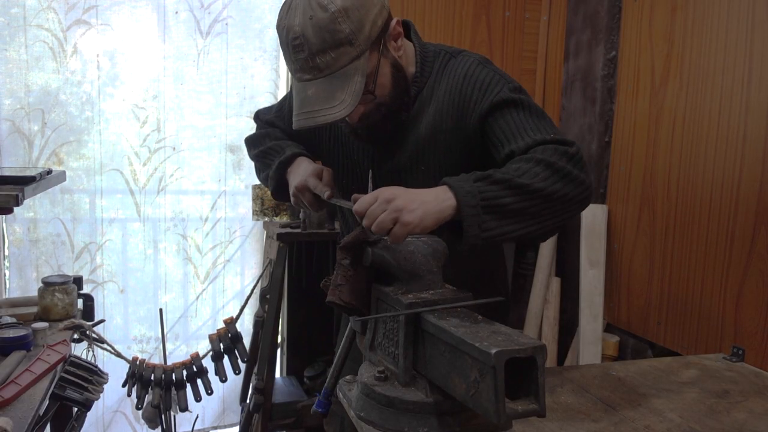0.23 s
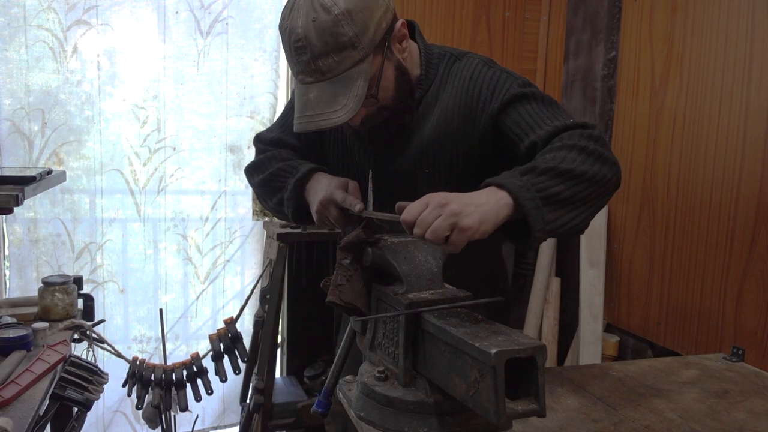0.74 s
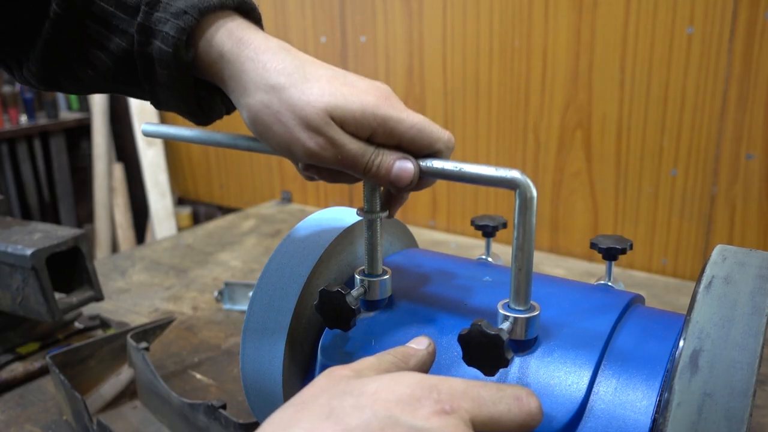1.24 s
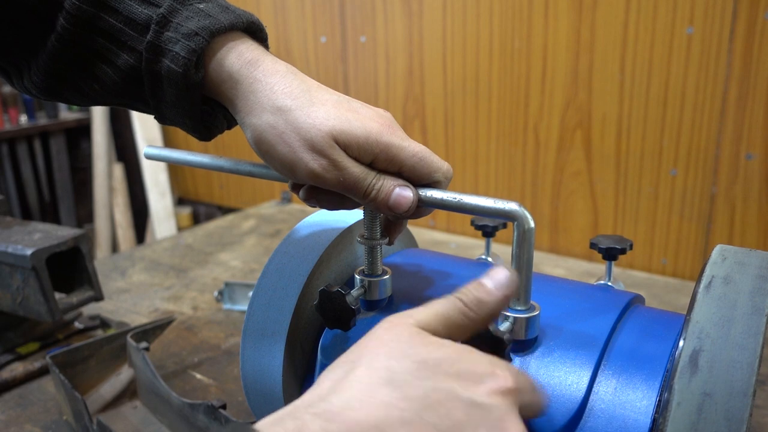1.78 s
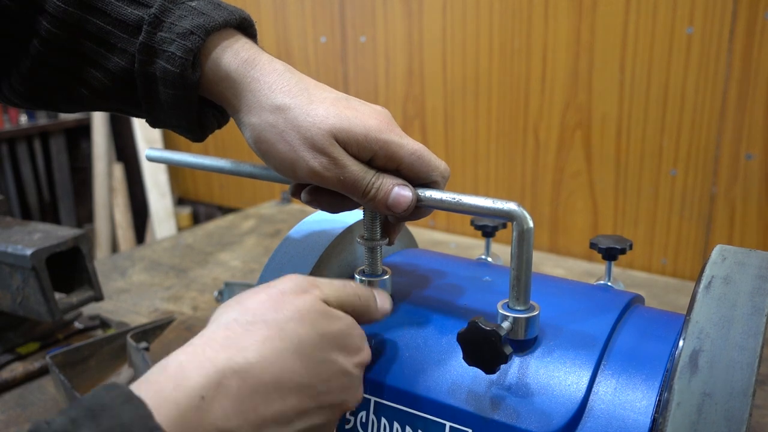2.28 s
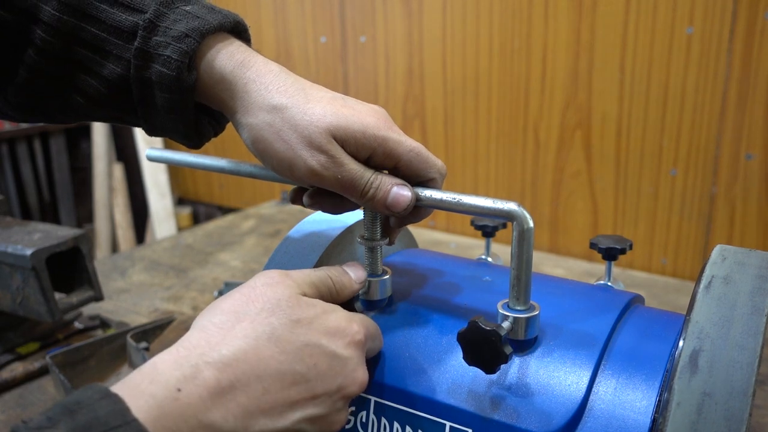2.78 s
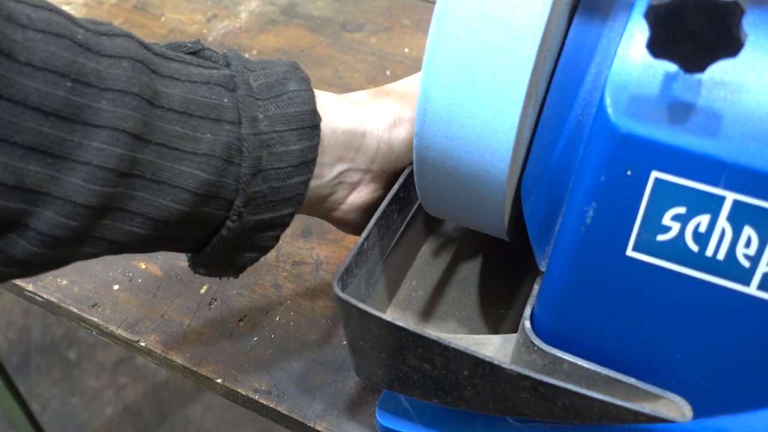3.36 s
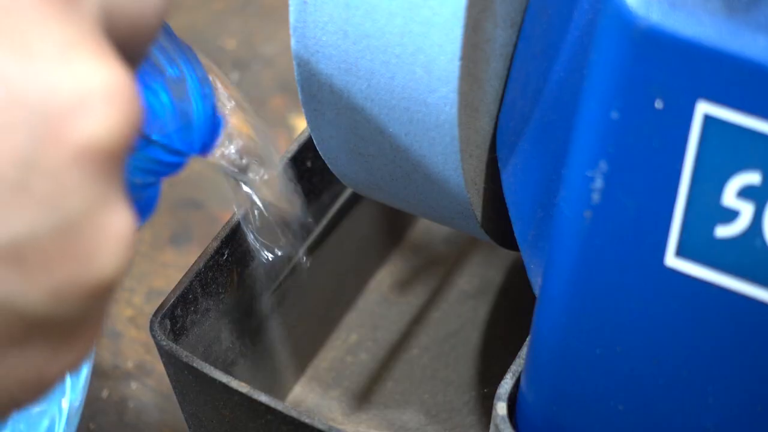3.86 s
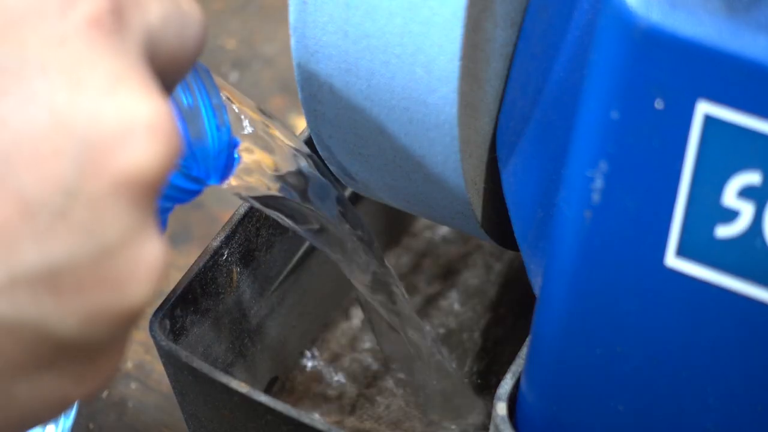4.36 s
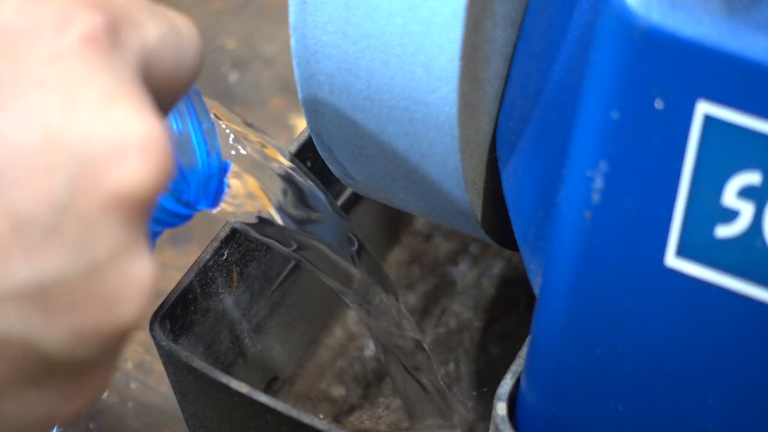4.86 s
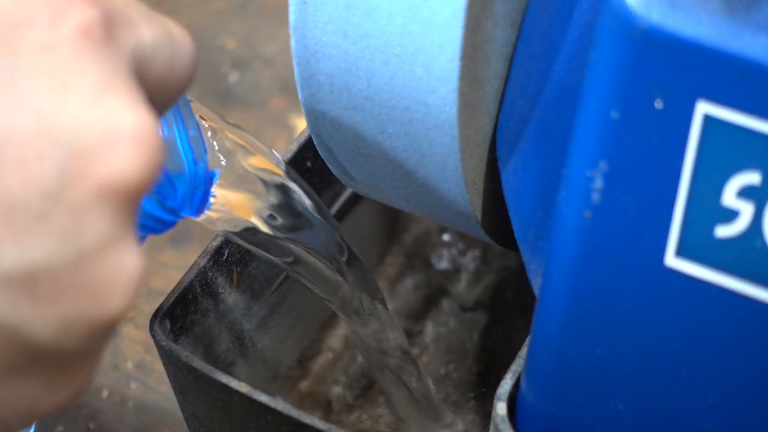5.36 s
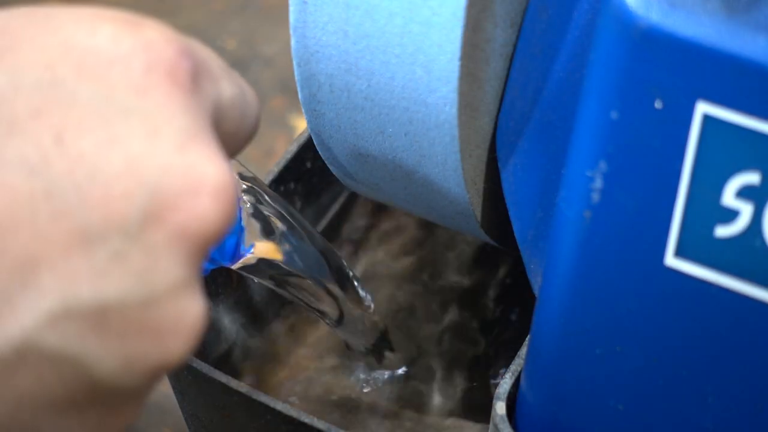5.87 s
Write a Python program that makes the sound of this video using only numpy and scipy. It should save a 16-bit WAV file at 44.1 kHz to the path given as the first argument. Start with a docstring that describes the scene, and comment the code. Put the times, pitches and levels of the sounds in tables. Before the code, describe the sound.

A bare, echoing workshop with faint, dull air, heard close up. At 0 s the tail of a file stroke fades; at 0.38 the file taps down on a steel chisel and a second gritty rasp swells to about 0.65, ringing metallically over a low bench rumble, cutting off at 0.87. A steel bar knocks at once, then judders and groans in its sleeves, strongest at 1.05-1.25, with lesser slips to 1.65, a sharp click at 1.8 and small creaks around 2.2-2.4. A soft, low bump comes at 2.66. From 2.9 a plastic trough scrapes with a short rising squeak, clatters home by 3.15, and shudders hollowly until 3.7. From 3.83 water drums softly, bubbling from 3.97, with bright splashes and spray, busiest at 4.8-5.0 with a deep gulp. A final slosh swells at 5.6, then at 5.67 the splashing drops abruptly to a quiet wash.

```python
"""Three jobs in a bare, echoing workshop, one straight after another, over faint still air.
First a hand file rasps over a chisel in a vise: clumped tooth catches excite the steel's resonances.
Next a steel support bar judders down into the sleeves of a wet grinder by stick-slip, knocks and groans.
Then, after a soft bump on the bench, the grinder's plastic trough is dragged, shoved home and shudders.
Last, water is poured into it from a bottle, bubbling, spattering and drumming, then cuts to a quiet wash."""
import sys
import numpy as np
from scipy import signal
from scipy.fft import rfft, irfft, next_fast_len
from scipy.io import wavfile
from scipy.ndimage import uniform_filter1d

SR = 44100
rng = np.random.default_rng(int(sys.argv[2]) if len(sys.argv) > 2 else 0)


def wav_out(sig):
    """Save sig, one row per channel (or a flat mono array), as 16-bit PCM at SR to the path in sys.argv[1]."""
    wavfile.write(sys.argv[1], SR, np.round(np.clip(np.atleast_2d(sig).T, -1, 1) * 32767).astype(np.int16))


N = 270333
TIME = np.arange(N) / SR   # s
CUTOFF_HZ = 11150

# Colour of the still air: (frequency [Hz], relative density [dB per Hz])
AIR_COLOUR = [(20, -4), (100, -2.5), (220, -5), (550, -13), (900, -22), (2000, -22.5), (4000, -27.5),
              (11000, -34.5)]
AIR_DB = -67.3
# Decay time of the workshop's echo: (frequency [Hz], t60 [s])
ROOM_T60 = [(120, 0.75), (400, 0.43), (1400, 0.626), (4000, 0.1858), (10000, .5)]
# Stereo width of surrounding sound: (frequency [Hz], side minus mid [dB])
WIDTH = [(120, -22.5), (280, -19.5), (550, -8.5), (2400, -2), (5000, 3.5), (10000, 1.5)]

# File strokes: (teeth bite [s], hardest push [s], rasp level [dB])
FILE_STROKES = [(0, .015, -42.3), (.384, .655, -36.3)]
# The push builds slowly and eases off faster
PUSH_RISE_DB_PER_S, PUSH_FADE_DB_PER_S = 26, 79
# Tooth hiss against the rasp at the hardest push; extra dB of hiss for each dB of push
HISS_DB, HISS_GROWTH = -2.3, .3
# File landing on the steel: (time [s], peak level [dB], brightness [dB per octave])
FILE_LANDS = [(0.381, -29, 1.5), (0.387, -32, -2.5)]
# Colour of the landing: (frequency [Hz], relative density [dB per Hz])
LANDING_COLOUR = [(300, -7), (950, 3), (1320, -7), (2000, 0), (3200, -7), (4800, 4), (6500, -12),
                  (8000, -19), (11000, -47.5)]
# Colour of the tooth catches: (frequency [Hz], relative density [dB per Hz])
RASP_COLOUR = [(300, -3), (560, -6), (850, 1), (1340, 2), (1480, -7), (1750, 1), (3300, 1), (6000, -10),
               (8500, -18.5), (11000, -18)]
# Resonances of the chisel: (frequency [Hz], width [Hz], gain [dB])
CHISEL_MODES = [(390, 25, -3), (915, 45, -3), (1115, 70, -8), (1275, 27, 0), (1320, 24, 5), (1900, 40, -3),
                (2060, 22, -6), (2460, 28, -5), (2780, 70, -7), (3085, 23, 2.5), (3150, 40, -8),
                (4280, 300, -10), (5200, 200, -12), (7300, 150, -8)]
# The file damps the chisel as it lands: share of the ring left, and time the ring takes to build
RING_DAMPED, RING_BUILD_S = .3, .14
# Colour of the bench's rumble: (frequency [Hz], relative density [dB per Hz])
BENCH_COLOUR = [(10, -18), (26, 2), (60, -7), (130, -14), (240, -10.5), (420, -30), (1000, -80)]
# The bench rumbles late and follows only a share of the push's swing in dB
BENCH_DB, BENCH_LAG_S, BENCH_FOLLOWS = -50, .08, .42
FILING_ENDS = 0.866   # s

# Slips of the bar in its sleeves: (time [s], judder level [dB], scrape level [dB])
BAR_SLIPS = [(0.905, -55, -51), (1.06, -41, -43), (1.094, -27, -40), (1.14, -43, -44), (1.186, -28, -39.5),
             (1.201, -28, -41), (1.25, -42, -44), (1.345, -40, -50), (1.39, -45, -55), (1.45, -39.5, -52.5),
             (1.505, -42.5, -57), (1.54, -47, -62), (1.645, -47, -49), (1.88, -56, -51), (2.23, -44, -53),
             (2.28, -50, -58), (2.355, -62, -58), (2.42, -57, -66), (2.49, -66, -63)]
# Every slip builds quickly; the judder dies sooner than the scrape
SLIP_RISE_DB_PER_S, JUDDER_FADE_DB_PER_S, SCRAPE_FADE_DB_PER_S = 560, 300, 95
# Knocks of the bar: (time [s], peak level [dB], brightness [dB per octave])
BAR_KNOCKS = [(0.866, -34, .8), (1.048, -40, -2.5), (1.076, -35, -5), (1.107, -33, -1.5),
              (1.186, -26.5, -2), (1.197, -29, -4.5), (1.6, -42.5, -4), (1.642, -45, -4.5),
              (1.811, -31.5, 2.3), (2.106, -54, 7), (2.207, -46, -6)]
# Resonances of the bar: (frequency [Hz], width [Hz], gain [dB])
BAR_MODES = [(338, 17, -2), (438, 22, -3), (473, 20, 0), (800, 79, 0), (1200, 140, -9), (2230, 470, -19),
             (3670, 740, -16)]
# Colour of the bar's contacts: (frequency [Hz], relative density [dB per Hz])
BAR_RUB_COLOUR = [(220, -7), (330, 9), (700, -3), (1400, -2.5), (3300, -13.5), (4600, -21), (11000, -33.5)]
# Judder pitch wandering as the bar tilts: (time [s], main resonance [Hz])
BAR_PITCH = [(1.19, 334), (1.28, 352), (1.465, 338), (1.5, 405), (1.53, 328), (1.65, 365), (2.21, 360),
             (2.29, 285)]

# Bump of a hand on the bench: (time [s], level [dB])
BENCH_BUMPS = [(2.66, -62)]
BUMP_DB_PER_S = 70   # builds and dies alike

# Drag of the trough's rim over the housing:
# (start [s], peak [s], level [dB], rise [dB per s], fade [dB per s])
RIM_DRAG = (2.905, 2.99, -41.5, 195, 150)
# Colour of the rim's scrape: (frequency [Hz], relative density [dB per Hz])
RIM_COLOUR = [(220, -9), (320, 2), (520, -9), (1100, -2), (2000, 2), (3000, -4), (4400, -8), (5000, -21),
              (11000, -31)]
# Squeak of the rim, rising with the drag: (time [s], pitch [Hz])
SQUEAK_PITCH = [(2.93, 1750), (2.985, 2250), (3.01, 2370)]
SQUEAK_DB, SQUEAK_JITTER = -1.5, .035   # gain of the sine in the drag; share of pitch
# Shove of the whole trough: (start [s], peak [s], level [dB], rise [dB per s], fade [dB per s])
SHOVE_HOME = (3.067, 3.11, -34.5, 110, 70)
GRUMBLE_DB = -2.5   # the shove's drive of the low judder, against its scrape
# Knocks of the trough: (time [s], peak level [dB], brightness [dB per octave])
TROUGH_KNOCKS = [(3.010, -39, 3), (3.024, -32, -17), (3.066, -30.5, -1), (3.090, -31.5, .5),
                 (3.098, -29, -3), (3.129, -30.5, 2.5)]
# Shudders of the settling trough: (time [s], level [dB])
SHUDDERS = [(3.038, -31), (3.112, -30), (3.147, -28.5), (3.298, -34.5), (3.402, -41.5), (3.455, -45),
            (3.513, -43), (3.555, -48), (3.69, -58)]
SHUDDER_RISE_DB_PER_S, SHUDDER_FADE_DB_PER_S = 900, 420
# Pitch of the shudder: (time [s], pitch [Hz])
TROUGH_PITCH = [(3.04, 292), (3.15, 251), (3.46, 250), (3.52, 280)]
# Resonances of the trough: (frequency [Hz], width [Hz], gain [dB])
TROUGH_MODES = [(251, 16, 8.5), (326, 30, 1), (535, 14, -5), (685, 106, 1), (1050, 60, -3), (1463, 33, -3),
                (1680, 97, -12), (4100, 400, -15)]
# Colour of the trough's contacts: (frequency [Hz], relative density [dB per Hz])
TROUGH_RUB_COLOUR = [(250, 0), (1000, 2.5), (2200, 1.5), (4300, -7.5), (5500, -18), (11000, -33)]

# The stream begins; it churns once the trough floor is covered; its splashing is cut off abruptly (s)
POUR_STARTS, CHURN_STARTS, POUR_CUTS = 3.825, 3.965, 5.668
# Churning under the stream, before the two trims below:
# (time [s], large bubbles [dB], fine spray [dB])
CHURNING = [(3.98, -66, -70), (4.17, -60, -63), (4.53, -60, -56), (4.808, -56, -55), (5.07, -58.5, -62.5),
            (5.53, -59, -64)]
BUBBLING_DB, SPRAY_DB = 1, 2
# Colour of the bubbling water: (frequency [Hz], relative density [dB per Hz])
WATER_COLOUR = [(500, -12), (1050, 5.5), (1600, -6), (2200, 2.5), (5000, 1.5), (7200, -7), (11000, -6)]
# Loudest splashes: (time [s], peak level [dB], pitch [Hz], spatter against bubbles [dB])
SPLASHES = [(4.038, -44, 1250, 6), (4.144, -42, 2700, 0), (4.294, -36, 4600, -5), (4.364, -42, 8000, -6),
            (4.554, -42.5, 3480, -1), (4.629, -39.5, 4400, -1), (4.647, -41.5, 2050, 0),
            (4.749, -43, 5760, -6), (4.805, -43.5, 6000, 0), (4.864, -40.5, 3750, -10),
            (4.895, -45, 2700, -4), (4.95, -34.5, 5600, -8), (4.974, -33, 2050, -5), (5.231, -46, 1400, 0),
            (5.324, -44.5, 2540, -1), (5.362, -45.5, 1210, 3), (5.435, -44, 2160, -1),
            (5.563, -38.5, 3200, 4), (5.649, -42, 1150, 0), (5.661, -44, 1250, 2)]
SCATTER_CYCLES = 12.5   # mean delay of a follower in cycles, so big low splashes last longer
# Lone ringing bubbles; the lowest is air gulped into the bottle:
# (time [s], pitch [Hz], level [dB], t60 [s])
LONE_BUBBLES = [(4.566, 2880, -38, .045), (4.935, 180, -38.5, .05), (4.977, 2020, -36, .07),
                (5.233, 2300, -42, .08), (5.238, 1400, -40, .08)]
# Resonances of the air in the trough: (frequency [Hz], width [Hz], gain [dB])
HOLLOW_MODES = [(1050, 80, -3), (1380, 45, -3), (2200, 170, -7)]
# Colour of the drumming stream: (frequency [Hz], relative density [dB per Hz])
DRUMMING_COLOUR = [(12, -23), (20, -1), (88, -4), (260, -17.5), (360, -15.5), (528, -25.5), (725, -18.5),
                   (995, -23.5), (1640, -33), (1830, -22.5), (2260, -23.5), (4140, -37), (11000, -38.5)]
# Last slosh from the bottle: (start [s], peak [s], level [dB], rise [dB per s], fade [dB per s])
SLOSH = (5.562, 5.6, -49.5, 30, 15)
SLOSH_SPRAY_DB, SLOSH_DRUM_DB = -11, -7   # against its bubbles


def from_db(db):
    """Logarithmic level: decibels to amplitude gain."""
    return 10 ** (np.asarray(db) / 20)


def rms_one(x):
    """Normalisation of power: scale to rms 1."""
    return x / np.sqrt(np.mean(x ** 2) + 1e-20)


def at_hz(points, hz):
    """Logarithmic frequency: interpolate a table along log Hz."""
    f, value = np.transpose(points)
    return np.interp(np.log(hz + 1e-3), np.log(f), value)


def tint(x, spectrum):
    """Spectral shaping: weight every frequency of a steady sound to give it a colour."""
    size = next_fast_len(x.shape[-1])
    hz = np.arange(size // 2 + 1) * SR / size
    coloured = irfft(rfft(x, size) * from_db(at_hz(spectrum, hz)), size)
    return coloured[..., :x.shape[-1]]


def diffuse(size=N):
    """Diffuse field: noise alike in both ears in the bass, unrelated in the treble."""
    mid, side = rng.standard_normal((2, size))
    return mid + tint(side, WIDTH) * [[1], [-1]]


def still_air():
    """Ambient noise: a steady diffuse field, strongest in the bass."""
    return from_db(AIR_DB) * rms_one(tint(diffuse(), AIR_COLOUR))


def band(x, low_hz, high_hz):
    """Band limitation: a causal band-pass."""
    sos = signal.butter(3, [low_hz, high_hz], "band", fs=SR, output="sos")
    return signal.sosfilt(sos, x + 1e-18)


def drift(rate):
    """Random fluctuation: normal values of spread 1, drawn at a rate per second and joined by lines."""
    return np.interp(TIME * rate, np.arange(4096), rng.standard_normal(4096))


def grains(per_s, spread_db, clump_db, clump_rate):
    """Contact of rough surfaces: random tiny impulses of uneven size that swell in clumps."""
    uneven_db = spread_db * np.minimum(rng.exponential(1, N), 4)
    sizes = from_db(uneven_db + clump_db * drift(clump_rate))
    return (rng.random(N) < per_s / SR) * sizes * rng.choice([-1, 1], N)


def body(x, modes, direct_db):
    """Modal resonance: parallel two-pole resonators beside the plain sound of the contact."""
    out = from_db(direct_db) * x
    for hz, width, db in modes:
        r = np.exp(-np.pi * width / SR)
        feed = np.array([1, 0, -1]) * (1 - r * r) / 2
        poles = [1, -2 * r * np.cos(2 * np.pi * hz / SR), r * r]
        out = out + from_db(db) * signal.lfilter(feed, poles, x + 1e-18)
    return out


def add(out, s, sound):
    """Superposition: mix a sound in at a time."""
    at = max(round(s * SR), 0)
    out[at:at + len(sound)] += sound[:max(len(out) - at, 0)]


def blows(rows, colour, modes, direct_db, chatter_s, rattle_db):
    """Impact excitation: a brief chatter drives the body, brighter for a harder contact."""
    out, t = np.zeros(N), TIME[:SR // 4]
    dying = np.exp(-t / chatter_s) + from_db(rattle_db) * np.exp(-t / 0.016)   # loose parts rattle on
    dying = dying * np.clip(t / .0015, 0, 1)
    for s, db, brightness in rows:
        tilted = [(hz, level + brightness * np.log2(hz / colour[0][0])) for hz, level in colour]
        chatter = tint(rng.standard_normal(len(t)), tilted) * dying
        ringing = band(body(chatter, modes, direct_db), 190, 12000)
        peak = np.sqrt(uniform_filter1d(ringing ** 2, SR // 100).max())   # rms over 10 ms
        add(out, s, from_db(db) * ringing / peak)
    return out


def even(x):
    """Level regulation: hold a rub near rms 1 over 1/30 s, leaving its quick roughness."""
    return x / np.sqrt(np.abs(uniform_filter1d(x ** 2, SR // 30)) + 1e-20)


def swell(start_s, peak_s, db, rise_db_per_s, fade_db_per_s):
    """Exponential growth and decay: the gain of one push builds to a peak, then fades."""
    below = np.maximum((peak_s - TIME) * rise_db_per_s, (TIME - peak_s) * fade_db_per_s)
    onset = np.clip((TIME - start_s) / .005, 0, 1)
    return from_db(db - np.minimum(below, 150)) * onset


def bend(x, ratio):
    """Time-scale change: a varying reading speed slides every resonance by one ratio."""
    return np.interp(np.cumsum(ratio), np.arange(N), x, period=N)


def workshop(x, wet_db, pan_db):
    """Reverberation: direct sound plus a dense echo with its own decay in each octave-wide band."""
    t, edges = TIME[:SR], np.geomspace(90, 13000, 8)
    noise = np.array([diffuse(size=SR), diffuse(size=SR)])
    noise = tint(noise, [(250, -6), (900, -2)])   # the echo is weaker in the bass
    tail = 0
    for k, (low, high) in enumerate(zip(edges, edges[1:])):
        t60 = at_hz(ROOM_T60, np.sqrt(low * high))
        tail = tail + band(noise[k % 2], low, high) * from_db(-60 * t / t60)
    tail = tail * np.clip(t / 0.0013, 0, 1)   # the bench and nearest wall answer first
    tail = tail / np.sqrt(np.sum(tail.mean(axis=0) ** 2) * SR / 2 / edges[-1])
    echo = signal.fftconvolve(x[None], tail, axes=1)[:, :N]
    heard = (x + from_db(wet_db) * echo) / np.hypot(1, from_db(wet_db))
    # only the middle range leans to one side
    ears = []
    for ear, lean in zip(heard, (pan_db, -pan_db)):
        ears.append(tint(ear, [(350, 0), (600, lean / 2), (2500, lean / 2), (4500, 0)]))
    return np.array(ears)


def filing():
    """Forced modal vibration: teeth catch on steel, ringing chisel and vise; the bench rumbles."""
    push = sum(swell(*stroke, PUSH_RISE_DB_PER_S, PUSH_FADE_DB_PER_S) for stroke in FILE_STROKES)
    effort = push / push.max()
    teeth = tint(grains(per_s=6000, spread_db=3, clump_db=3, clump_rate=220), RASP_COLOUR)
    free = np.clip(np.abs(TIME - FILE_LANDS[0][0]) / RING_BUILD_S, RING_DAMPED, 1)
    # the direct part is raised as much as the ring's drive is damped
    steel = body(free * teeth, CHISEL_MODES, direct_db=-10 - 20 * np.log10(free))
    steel = bend(steel, 1 + .005 * drift(20))   # the ring shifts as the contact travels
    rasp = even(band(steel, 187, 3880))
    hiss = from_db(HISS_DB) * effort ** HISS_GROWTH * even(band(steel, 3200, 11000))
    cut = push * (rasp + hiss)
    landing = blows(FILE_LANDS, LANDING_COLOUR, CHISEL_MODES, direct_db=-3, chatter_s=0.0027, rattle_db=-17.5)
    late_effort = np.interp(np.abs(TIME - BENCH_LAG_S), TIME, effort)
    rumble = from_db(BENCH_DB) * late_effort ** BENCH_FOLLOWS
    bench = rumble * rms_one(tint(diffuse(), BENCH_COLOUR))
    return (workshop(cut + landing, wet_db=-3, pan_db=-1.4) + bench) * (TIME < FILING_ENDS)


def slipping(s, db, rise_db_per_s, fade_db_per_s):
    """Intermittent friction: gain of slips of one shape, the strongest prevailing at each moment."""
    slips = [swell(0, at, level, rise_db_per_s, fade_db_per_s) for at, level in zip(s, db)]
    return np.max(slips, axis=0)


def groan(pitch, db, jitter, rough_db):
    """Mode locking: stick-slip settles on one resonance as a nearly pure, unsteady tone."""
    hz = np.interp(TIME, *np.transpose(pitch)) * (1 + jitter * drift(160))
    phase = 2 * np.pi * np.cumsum(hz) / SR
    return np.sqrt(2) * np.sin(phase) * from_db(db + rough_db * drift(130))


def support_bar():
    """Stick-slip friction: the legs catch and slip in their sleeves, knocking home and groaning."""
    s, judder_db, scrape_db = np.transpose(BAR_SLIPS)
    judder = slipping(s, judder_db, SLIP_RISE_DB_PER_S, JUDDER_FADE_DB_PER_S)
    scrape = slipping(s, scrape_db, SLIP_RISE_DB_PER_S, SCRAPE_FADE_DB_PER_S)
    contacts = tint(grains(per_s=4000, spread_db=3.0, clump_db=5, clump_rate=78), BAR_RUB_COLOUR)
    slips = body(contacts, BAR_MODES, direct_db=-8)
    tilting = np.interp(TIME, *np.transpose(BAR_PITCH)) / BAR_MODES[0][0]
    low_rub = from_db(-2) * judder * even(bend(band(slips, 190, 580), tilting))
    high_rub = scrape * even(band(slips, 570, 12000))
    knocks = blows(BAR_KNOCKS, BAR_RUB_COLOUR, BAR_MODES, direct_db=-5.5, chatter_s=0.004, rattle_db=-16)
    tone = judder * groan(BAR_PITCH, db=-2, jitter=.025, rough_db=1.5)
    return workshop(low_rub + high_rub + knocks, wet_db=-4.5, pan_db=-1.2) + tone


def bench_bump():
    """Low-frequency impact: a hand on the bench gives a low rumble that builds and dies alike."""
    gain = slipping(*np.transpose(BENCH_BUMPS), BUMP_DB_PER_S, BUMP_DB_PER_S)
    return gain * rms_one(band(rng.standard_normal(N), 70, 150))


def rim_drag():
    """Sliding friction: the rim scrapes along the housing with an unsteady, rising squeak."""
    contacts = tint(grains(per_s=2000, spread_db=3, clump_db=3, clump_rate=200), RIM_COLOUR)
    scrape = even(band(contacts, 200, 11000))
    squeak_hz = np.interp(TIME, *np.transpose(SQUEAK_PITCH)) * (1 + SQUEAK_JITTER * drift(900))
    squeak = np.sin(2 * np.pi * np.cumsum(squeak_hz) / SR)
    return swell(*RIM_DRAG) * (scrape + from_db(SQUEAK_DB) * squeak)


def trough():
    """Friction and impact on a plastic shell: it drags, clatters into its seat and shudders to rest."""
    drag = rim_drag()
    shove = swell(*SHOVE_HOME)
    shudder = slipping(*np.transpose(SHUDDERS), SHUDDER_RISE_DB_PER_S, SHUDDER_FADE_DB_PER_S)
    judder = np.hypot(from_db(GRUMBLE_DB) * shove, shudder)
    contacts = tint(grains(per_s=4000, spread_db=1.5, clump_db=1.5, clump_rate=110), TROUGH_RUB_COLOUR)
    slips = body(contacts, TROUGH_MODES, direct_db=-5.5)
    low_rub = from_db(-1) * judder * even(band(slips, 190, 540))
    high_rub = shove * even(band(slips, 420, 13000))
    knocks = blows(TROUGH_KNOCKS, TROUGH_RUB_COLOUR, TROUGH_MODES,
                   direct_db=-7, chatter_s=0.0056, rattle_db=-17.5)
    tone = judder * groan(TROUGH_PITCH, db=-4, jitter=.05, rough_db=2.5)
    return workshop(low_rub + high_rub + drag + knocks, wet_db=-6.5, pan_db=-1.4) + tone


def bubble(hz, cycles, rise):
    """Bubble resonance: trapped air rings while falling 60 dB, its pitch rising near the surface."""
    age = np.arange(int(cycles * SR / hz) + 2) * hz / (cycles * SR)   # 0 to 1 over the ring
    return np.sin(2 * np.pi * cycles * age * (1 + rise * age / 2)) * from_db(-60 * age)


def fizz(spread_db, cycles, rise, count=5000):
    """Superposed bubble resonances: many sizes under the stream, a few much louder than the rest."""
    out = np.zeros(N)
    for when, size, strength in rng.random((count, 3)):
        hz = 600 * 18 ** size
        loudness = from_db(-spread_db * np.log(strength + .02))
        s = POUR_STARTS + when * (TIME[-1] - POUR_STARTS)
        add(out, s, loudness * hz * bubble(hz, cycles, rise))
    return out


def splashes(pitch_spread, cycles, spatter_s, followers_db, count=12):
    """Air entrainment: a short spatter traps one main bubble, then a cluster of weaker ones."""
    out, t = np.zeros(N), TIME[:SR // 8]
    for s, db, hz, spatter_db in SPLASHES:
        cluster = np.zeros(len(t))
        add(cluster, 0, bubble(hz, cycles, rise=.1))
        for late, size in zip(rng.exponential(1, count), rng.standard_normal(count)):
            pitch = min(hz * np.exp(pitch_spread * size), CUTOFF_HZ)
            strength = from_db(followers_db) * np.exp(-(late + size ** 2) / 2) * rng.choice([-1, 1])
            delay = min(late, 4) * SCATTER_CYCLES / hz
            add(cluster, delay, strength * bubble(pitch, cycles, rise=0.23))
        cluster = cluster / np.sqrt(uniform_filter1d(cluster ** 2, SR // 250).max())   # rms over 4 ms
        burst = np.sqrt(2 * t / spatter_s) * np.exp(-t / spatter_s)
        spatter = band(rng.standard_normal(len(t)), 800, 6000) * burst
        add(out, s, from_db(db) * (cluster + from_db(spatter_db) * spatter))
    return out


def pouring():
    """Bubble resonance in a hollow: drumming, bubbles and a slosh; it cuts abruptly to a quiet wash."""
    times, bubbling_db, spray_db = np.transpose(CHURNING)
    running, churning = TIME > POUR_STARTS, TIME > CHURN_STARTS
    slosh = swell(*SLOSH) * (TIME < POUR_CUTS)
    bubbling = churning * from_db(BUBBLING_DB + np.interp(TIME, times, bubbling_db)) + slosh
    spray = churning * from_db(SPRAY_DB + np.interp(TIME, times, spray_db))
    spray = spray + from_db(SLOSH_SPRAY_DB) * slosh
    stream = tint(fizz(spread_db=3.4, cycles=50, rise=0.078), WATER_COLOUR)
    large, small = band(stream, 420, 2800), band(stream, 2450, 11600)
    water = bubbling * large / large[running].std() + spray * small / small[running].std()
    water = water * from_db(1.5 * drift(40))
    water = water + splashes(pitch_spread=.26, cycles=27, spatter_s=.005, followers_db=-1)
    water = body(water, HOLLOW_MODES, direct_db=-1)
    for s, hz, db, t60 in LONE_BUBBLES:
        add(water, s, from_db(db) * bubble(hz, hz * t60, rise=.06))
    drum_gain = np.hypot(from_db(-55.5) * running, from_db(SLOSH_DRUM_DB) * slosh)
    drumming = rms_one(body(tint(diffuse(), DRUMMING_COLOUR), TROUGH_MODES[:2], direct_db=0))
    cut = np.where(TIME < POUR_CUTS, 1, from_db(-25))   # one step down
    return workshop(water, wet_db=-6, pan_db=-.7) * cut + drum_gain * drumming


def scene():
    """Superposition: the three jobs and the bump on the bench over the still air."""
    return still_air() + filing() + support_bar() + bench_bump() + trough() + pouring()


def record(dry):
    """Band limitation: a steep elliptic low-pass cuts the top."""
    return signal.sosfilt(signal.ellip(12, .1, 70, CUTOFF_HZ, fs=SR, output="sos"), dry)


dry = scene()
out = record(dry)
wav_out(out)
```